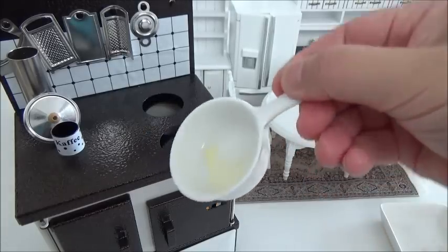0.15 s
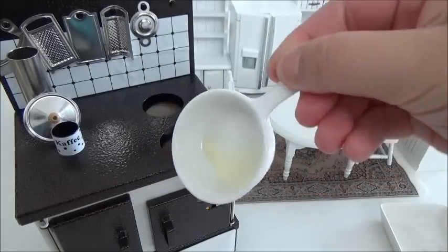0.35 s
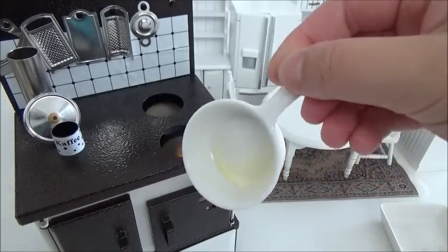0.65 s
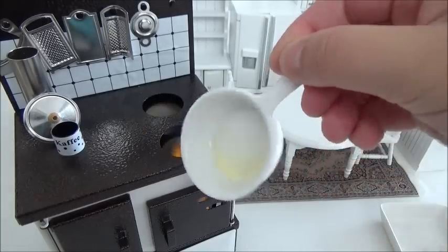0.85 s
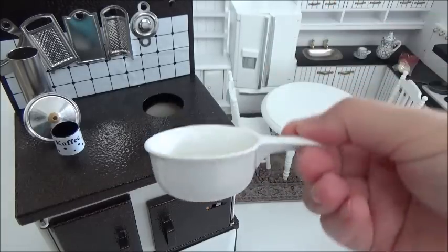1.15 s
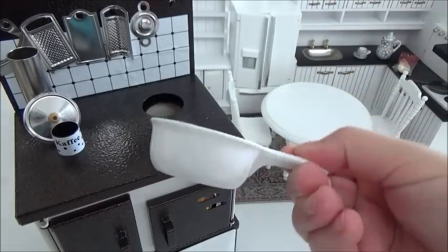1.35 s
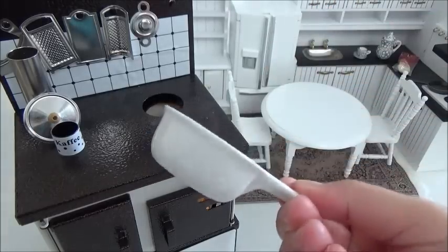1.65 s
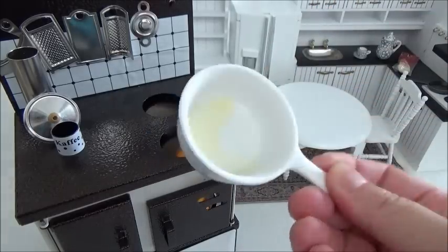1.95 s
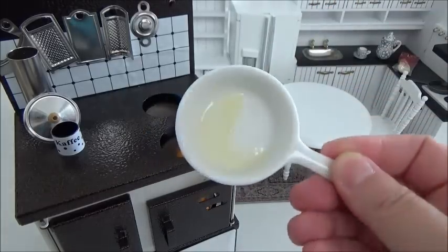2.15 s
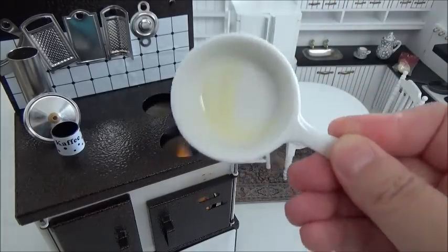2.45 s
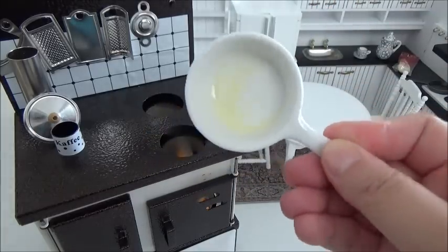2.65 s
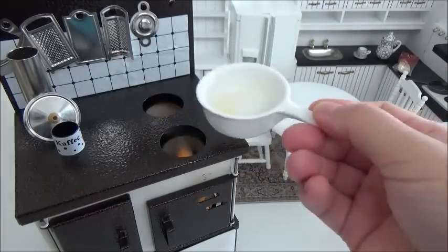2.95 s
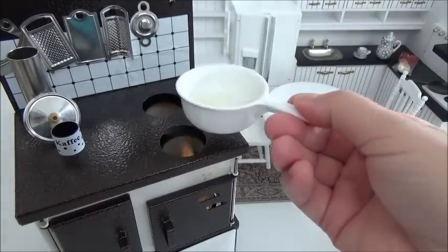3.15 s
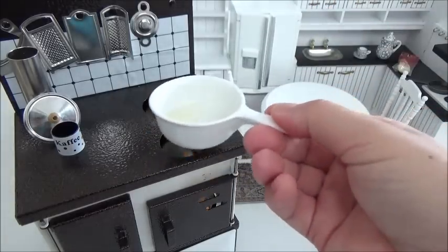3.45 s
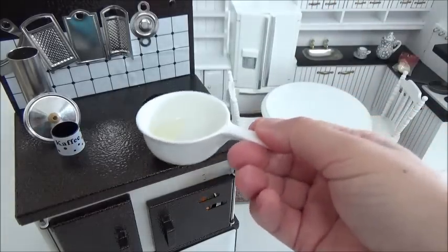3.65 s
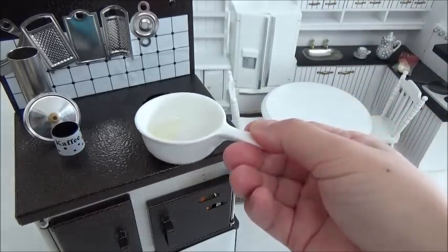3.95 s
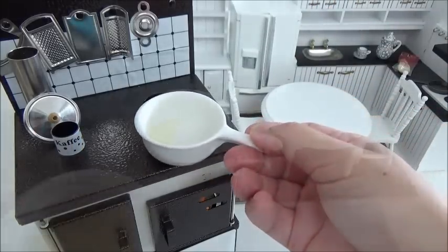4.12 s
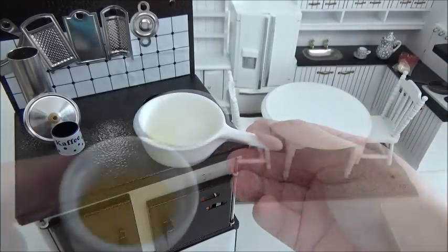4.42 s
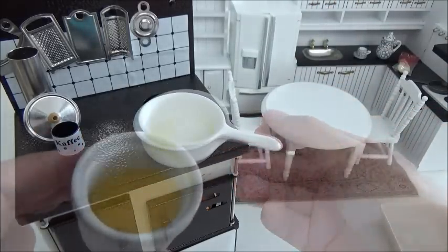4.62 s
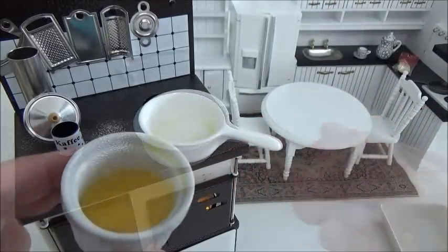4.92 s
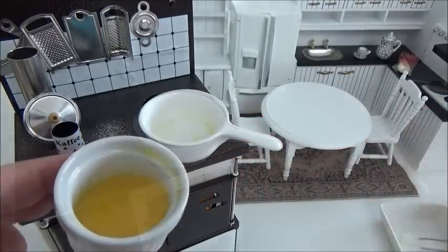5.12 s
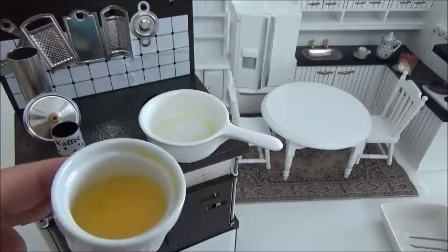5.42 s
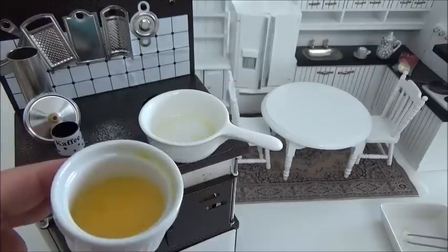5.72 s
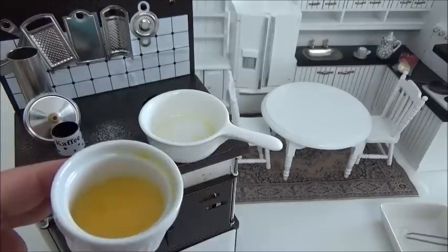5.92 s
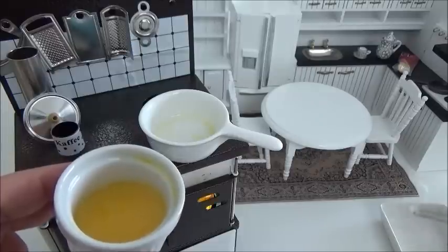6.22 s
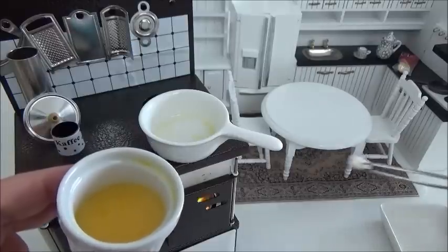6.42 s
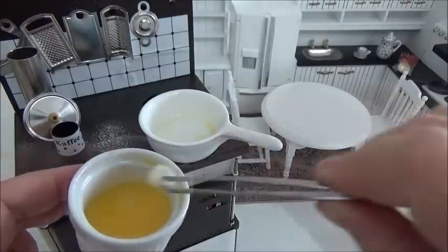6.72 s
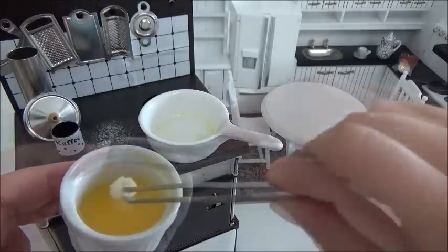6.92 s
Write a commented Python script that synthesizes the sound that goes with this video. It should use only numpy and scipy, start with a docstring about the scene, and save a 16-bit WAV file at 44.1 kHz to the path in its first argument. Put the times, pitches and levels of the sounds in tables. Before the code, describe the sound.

Bright, crackling sizzle of hot oil fades, surges once and dwindles; a soft pan knock, louder hum, then tiny crockery clicks and a metallic tink.

```python
"""A film of oil sizzles close by in a doll-size ceramic pan on a tiny stove: dense damped sines and ticks.
It flares as the pan is tilted, with snaps, pings and whistling spurts of steam, then dies away.
The pan is set down with a light knock: filtered noise for the stove, dying sines for pan and burner.
After that the humming room (shaped noise) is louder, and a little cup and steel tweezers click
as they are handled: short noise bursts and ringing modes."""
import sys
import numpy as np
from scipy import signal
from scipy.fft import irfft
from scipy.io import wavfile
from scipy.ndimage import uniform_filter1d

SR = 44100
rng = np.random.default_rng(int(sys.argv[2]) if len(sys.argv) > 2 else 0)


def put_to_file(sound):
    """Save the sound as 16-bit audio at rate SR, in the file named by the first command-line argument."""
    columns = np.atleast_2d(sound).T  # one column per channel
    safe = np.clip(columns, -1, 1)
    whole_steps = np.round(safe * 32767)
    wavfile.write(sys.argv[1], SR, whole_steps.astype(np.int16))


N = 311787
TIME = np.arange(N) / SR

USUAL_DB = -50  # level of a moderate sizzle
FIERCE_DB = -49.5  # above this level the boiling oil brightens

# colour of the sizzle: f/Hz, level/dB
FIZZ_COLOUR = [(600, -27), (1500, -7), (2200, 0), (2650, -0.5), (3000, 1.5), (4400, 0.5), (5600, -1.5),
               (7500, -4.5), (10000, 5.5), (13000, 1.5), (15500, 4.5)]
# colour of a bubble's snap: f/Hz, level/dB
SNAP_COLOUR = [(700, -26.5), (2000, -9), (2650, -10), (3050, -1.5), (4200, -3), (5500, -1.5), (7500, -3),
               (10300, 2.5), (13200, -2), (15300, 3), (18000, -3)]
# colour of the little cup: f/Hz, level/dB
CUP_COLOUR = [(1000, 4), (2000, -11), (2750, 3), (3450, 1), (4000, 4), (4700, 2), (5400, 8), (6550, 12.5),
              (7550, 4), (8400, 5.5), (11300, 5.5), (13000, 2.5), (15500, 1)]


def sizzle(gain_db=-0.6, spread_db=5.0, largest=3.03, favour_db=10.5, favour_hz=1400,
           cycles=1.0, tick_db=1.5, count=32):
    """Countless tiny bubbles tick and ring: gentle oil spits in clumps, fierce oil fizzes densely."""
    # the oil as the pan is tilted: t/s, thinness of the film (0-1), ring of the bowl/dB
    oil = [(0, 0.3, 9), (.3, 0.35, 7), (1.1, 0.11, -3), (1.9, 0.03, -5), (2.15, 0.07, 1), (2.55, 0.76, -22),
           (2.85, 0.5, 0), (3.1, .2, 16), (3.8, 0, 6)]
    bubbles_per_s, clump_usual_db = 2400, 2  # before clumping, for a thick film at USUAL_DB
    doubling_db = 10  # this much louder, twice as many bubbles burst
    clump_fall = 0.1  # dB less clumping for each dB louder
    film_db = 15  # a thin film fizzes as densely and evenly as a pool this much louder
    tilt_usual_db, brightening = -4.5, 2.6  # treble tilt, and its rise per dB above FIERCE_DB

    level_db, centre_hz = boiling()
    s, *columns = np.transpose(oil)
    film, bowl_db = (np.interp(TIME, s, column) for column in columns)
    crowding_db = level_db - USUAL_DB + film_db * np.clip(film, 0, 1)
    rate = bubbles_per_s * 2 ** (crowding_db / doubling_db)
    clump_db = np.maximum(clump_usual_db - clump_fall * crowding_db, 0)
    tilt_db = tilt_usual_db + brightening * np.maximum(level_db - FIERCE_DB, 0)

    # when each bubble bursts, how big it is and which pitch it takes
    unevenness = evened(uniform_filter1d(rng.standard_normal(N), size=300))
    clumps = amp(clump_db * unevenness)
    at = np.flatnonzero(rng.random(N) < rate * clumps / SR)
    size_draw, sign_draw, pitch_draw = rng.random((N, 3))[at].T
    size_db = spread_db * np.minimum(-np.log(size_draw), largest)
    sizes = clumps[at] * amp(size_db) * np.sign(sign_draw - .5)
    kind = (pitch_draw * count).astype(int)

    rings = np.zeros(N)
    for k, hz in enumerate(np.linspace(3400, 15500, count)):
        chosen = kind == k
        i = at[chosen]
        favoured_db = favour_db * np.exp(-((hz - centre_hz[i]) / favour_hz) ** 2)
        weight_db = tilt_db[i] * np.log(hz / 8500) + favoured_db
        train = np.zeros(N)
        train[i] = sizes[chosen] * amp(weight_db)
        note = bubble(hz, cycles * (1 + k % 3) * hz / 10000)
        rings += signal.oaconvolve(train, note / np.linalg.norm(note))[:N]
    ticks = np.zeros(N)
    ticks[at] = amp(tick_db) * sizes
    fizz = hollow(coloured(rings, FIZZ_COLOUR) + coloured(ticks, SNAP_COLOUR), bowl_db)

    # level the fizz, then let it follow the boiling
    power = uniform_filter1d(fizz ** 2, size=2500)
    loudness = np.sqrt(abs(power) + 1e-3 * np.median(power) + 1e-12)
    fade = np.interp(TIME, [4, 4.6], [1, 0])  # the sizzle fades out between 4 and 4.6 s
    return fade * amp(level_db + gain_db) * fizz / loudness


def boiling():
    """How hard the oil boils, as a level in dB, and the pitch in Hz its bubbles favour."""
    # the fine sizzle before surges and gain: t/s, level/dB, favoured bubble pitch f/Hz
    course = [(0, -36.5, 10100), (0.115, -39.5, 10000), (0.165, -45, 10500), (0.37, -48.5, 9800),
              (0.6, -50.5, 9700), (0.8, -55.5, 10200), (0.97, -56.5, 10000), (1.07, -63, 12000),
              (1.3, -64, 13000), (1.56, -67, 12200), (1.63, -62, 11600), (1.8, -62, 12000),
              (1.87, -49.5, 14200), (1.93, -47, 14400), (1.98, -46, 9200), (2.04, -43, 8200),
              (2.15, -38, 12400), (2.31, -43, 11500), (2.39, -50, 13400), (2.76, -54, 11900),
              (3.05, -64, 11500), (3.45, -65.5, 12000), (4, -70.5, 13400)]
    # brief surges and lulls: start t/s, length/s, extra level/dB
    surges = [(0.231, 0.018, 4.5), (0.267, 0.043, -3.5), (0.29, 0.012, 2), (0.624, 0.051, -5.5),
              (0.7, .024, 3.5), (2.624, 0.055, -1.5), (2.889, 0.048, 1.5)]
    s, level_db, centre_hz = np.transpose(course)
    surges_db = sum(db * plateau(start, length, edge_s=0.0019) for start, length, db in surges)
    return np.interp(TIME, s, level_db) + surges_db, np.interp(TIME, s, centre_hz)


def bubble(hz, cycles, size=400):
    """A bursting bubble: a sine that decays to 1/e over the given cycles."""
    turns = hz * np.arange(size) / SR
    return np.sin(2 * np.pi * turns) * np.exp(-turns / max(cycles, .2))


def crackle(per_s=260, over_db=6, spread_db=4, largest=1.6, follow=1.0, dull_db=-3, bright_db=6,
            fierce_span_db=9, loudest_db=-25, end_s=4.1, count=16):
    """Middle-sized bubbles snap at random, louder and brighter the harder the oil boils."""
    at = np.flatnonzero((rng.random(N) < per_s / SR) & (TIME < end_s))
    size, chance = rng.random((N, 2))[at].T
    level_db = boiling()[0][at]
    size_db = spread_db * np.minimum(-np.log(size), largest)
    peaks_db = USUAL_DB + follow * (level_db - USUAL_DB) + over_db + size_db
    fierceness = np.clip((level_db - FIERCE_DB) / fierce_span_db, 0, 1)
    brightness = (chance + fierceness) / 2
    # a small set of snaps, from dull to bright, to draw on
    snaps = [snap(treble_db) for treble_db in np.linspace(dull_db, bright_db, count)]
    out = np.zeros(N)
    for i, peak_db, share in zip(at, peaks_db, brightness):
        add(out, i / SR, amp(min(peak_db, loudest_db)) * snaps[int(share * count)])
    return out


def pops(gain_db=2):
    """The larger bubbles burst one by one, each with a dry snap."""
    # snaps: t/s, peak level/dB before gain, treble against the middle/dB
    bursts = [(.0217, -16, 4.5), (.0308, -18, 9), (0.1, -17, 6), (.1027, -21, 6), (.1163, -19, 2),
              (0.125, -21, -3), (0.178, -24.5, -2), (.196, -26.5, -5), (.223, -22, -3), (.246, -23, -1),
              (.2506, -27, -1), (0.293, -20, 4), (.2985, -26, 7), (0.307, -26, 5), (0.335, -28, 5),
              (.3418, -24, 4), (.3525, -24, 2), (0.3724, -24, 1), (.3844, -29, -2), (.4146, -30, -2),
              (.419, -25, 3), (.4346, -29, 4), (.4422, -24, -2), (.4632, -26, 3), (.4836, -25, 0),
              (.4905, -24, 2), (.5025, -29, 3), (0.5153, -17, 3), (0.5274, -24, 3), (0.53, -29, -2),
              (.5396, -30, 4), (.548, -28, 1), (0.564, -26, 0), (.5939, -27, 1), (0.5996, -26, 1),
              (.6073, -24, 3), (.6133, -28, 3), (.6217, -21.5, 1), (0.6454, -22, 2), (.662, -24, 1),
              (.6649, -27, 2), (.6774, -26, 3), (.6871, -26, 3), (.69, -18.5, 0.5), (.6929, -27, 5),
              (.6975, -22, 1), (.716, -26, 0), (0.7235, -24, 1), (.729, -19, 4), (.734, -21, 2),
              (.7533, -29, 1), (.7592, -30, 1), (.7765, -19, 3), (.793, -26, 6), (.803, -24.5, 0),
              (.846, -28, 4), (.863, -30, 0), (0.8893, -34, -6), (0.9094, -19, 2), (0.926, -30, 4),
              (.9436, -30, 2), (.9633, -32, 1), (.9714, -20.5, 0), (0.9767, -31, 0), (1.012, -23.5, -.5),
              (1.015, -24, 3), (1.03, -21.5, 1), (1.069, -22, 2), (1.108, -38, 0), (1.1405, -38, 3),
              (1.1634, -26, -3.5), (1.1702, -22.5, 1), (1.19, -31, 2), (1.1959, -25, -1.5),
              (1.209, -32, -4), (1.2154, -36, -5), (1.275, -25, 2), (1.2807, -35, -5), (1.2996, -27, -4),
              (1.3168, -36, 4), (1.363, -38, 0), (1.4688, -41, 5), (1.4812, -40, -1), (1.5072, -40, 3),
              (1.5963, -32, 1), (1.612, -32, -2), (1.6164, -27, -3.5), (1.64, -32, 2), (1.6456, -35, 4),
              (1.6741, -36, 2), (1.703, -29, -5.5), (1.7323, -33, -7), (1.7488, -35, 12), (1.7715, -26, 14),
              (1.791, -31, -1), (1.8128, -23, 5.5), (1.817, -25, 3), (1.855, -25, 1), (1.899, -21, 8),
              (1.912, -23, 13), (1.923, -26, 5), (1.9397, -18, -1.5), (1.9437, -24, -1), (1.969, -21, 2),
              (1.977, -26, 4), (1.9905, -19, 2), (1.9973, -18, 1), (2.013, -18.5, 2), (2.0178, -21, 1),
              (2.0262, -19, 5), (2.03, -21, 5), (2.048, -17, 1), (2.0564, -20, 3), (2.0864, -19, -2),
              (2.0954, -19, 2), (2.1066, -17, 8), (2.139, -18, 7), (2.147, -17, 7), (2.1776, -18, 7),
              (2.2354, -23, -2.5), (2.2388, -22.5, -1), (2.2487, -26, 8), (2.2769, -24, 6),
              (2.2963, -22.5, 0), (2.3031, -27, -1), (2.3566, -31, 2), (2.3941, -34, 1), (2.424, -31, 0),
              (2.465, -31, -4), (2.4754, -34, 3), (2.515, -36, -1), (2.5262, -32, -5), (2.5463, -32, -8),
              (2.5763, -32, -3), (2.581, -29, -2), (2.5914, -20.5, -3), (2.637, -35, 0), (2.6809, -23.5, 1),
              (2.7138, -28, 11), (2.7293, -32, 0), (2.7377, -25, -4.5), (2.7726, -32, -1),
              (2.7836, -29, -.5), (2.7886, -34, 6), (2.8037, -31, -2), (2.8392, -35, 1), (2.9021, -35, 0),
              (2.9126, -33.5, -3), (2.963, -34, -1), (3.063, -32.5, -2), (3.0735, -30, 1.5),
              (3.1543, -36.5, 0), (3.159, -35, -1), (3.3067, -37, -3), (3.34, -37.5, -4), (3.362, -40, -4),
              (3.648, -35, 4.5), (3.9365, -34.5, 0), (3.9564, -43, 2)]
    out = np.zeros(N)
    for s, db, treble_db in bursts:
        add(out, s, amp(db + gain_db) * snap(treble_db))
    return out


def snap(treble_db, spray_db=-26, spray_s=0.0021, uneven_db=1.5, count=9, size=512):
    """A bubble's skin tears: a pulse and brief spray ring in the bowl, with a slight unevenness of tone."""
    burst = amp(spray_db) * contact(spray_s, size=size)
    burst[0] = 1
    hz = np.linspace(3000, 16000, count)
    tone_db = treble_db * np.log2(hz / 7000) + uneven_db * rng.standard_normal(count)
    toned = coloured(coloured(burst, SNAP_COLOUR), np.transpose([hz, tone_db]))
    return peaked(hollow(toned, share_db=-4.0))


def pings(gain_db=-2.0, spray_db=-19, spray_s=0.0022):
    """A few surfacing bubbles ring on at their own pitch, each with a brief spray of droplets."""
    # ringing bubbles: t/s, peak level/dB before gain, pitch f/Hz, decay to 1/e in cycles
    surfacings = [(0.0304, -20, 9600, 13), (.0408, -21, 9250, 14), (0.049, -25, 8750, 3.4),
                  (.101, -20, 9200, 11), (0.1096, -17, 9940, 11), (.293, -25, 9750, 2.7),
                  (0.3923, -21.5, 7400, 2.9), (0.792, -26, 9200, 4.5), (1.0694, -29, 3160, 2),
                  (1.273, -22, 14700, 5.7), (1.773, -18.5, 11500, 12), (2.181, -22, 11500, 22)]
    out = np.zeros(N)
    for s, db, hz, cycles in surfacings:
        spray = amp(spray_db) * coloured(contact(spray_s), FIZZ_COLOUR)
        burst = peaked(bubble(hz, cycles, size=len(spray))) + spray
        add(out, s, amp(db + gain_db) * peaked(hollow(burst)))
    return out


def spurts(whistle_width_hz=900, grit_db=6, size=4000):
    """Steam squeezes out of the oil: sputtering hisses whose whistle glides as the opening changes."""
    # jets: t/s, length/s, level/dB before fades, whistle start f/Hz, end f/Hz, whistle against hiss/dB
    jets = [(0.293, 0.02, -42.5, 7000, 7100, 19), (1.409, 0.012, -55, 9050, 8700, 8),
            (1.436, 0.02, -59, 8600, 8300, 4), (1.533, 0.019, -48.5, 6400, 6400, -26),
            (1.594, 0.014, -46, 10500, 11000, -14), (1.661, 0.0057, -46, 9800, 9700, -3),
            (1.68, 0.0092, -43, 10000, 9900, -6), (1.701, 0.011, -50, 10000, 9700, 0),
            (1.732, 0.012, -49.5, 9200, 8600, -5), (1.889, 0.014, -38.5, 11700, 11200, -7),
            (1.966, 0.02, -44, 8300, 9200, 12), (2.098, 0.0226, -36.5, 8200, 9400, 13),
            (2.12, 0.023, -49, 13200, 14800, 12), (2.148, 0.011, -48, 6900, 7000, 13),
            (2.202, 0.024, -49, 12200, 13400, 12), (2.698, .02, -43.5, 14000, 12000, 8)]
    pole = np.exp(-np.pi * whistle_width_hz / SR)
    out = np.zeros(N)
    for s, length, db, start_hz, end_hz, whistle_db in jets:
        jet = sputter(length, grit_db, size=size)
        glide_hz = np.linspace(start_hz, end_hz, len(jet))
        turn = np.exp(2j * np.pi * np.cumsum(glide_hz) / SR)
        # a narrow band of the jet's own noise, kept around the gliding pitch
        whistle = (turn * signal.lfilter([1], [1, -pole], jet / turn)).real
        hiss = hollow(coloured(jet, SNAP_COLOUR), share_db=-5)
        steam = evened(hiss) + amp(whistle_db) * evened(whistle)
        add(out, s, amp(db) * evened(steam) * signal.windows.tukey(len(steam), .5))
    return out


def sputter(length, grit_db, size):
    """A short rush of noise, broken into uneven grains."""
    hiss, grains = rng.standard_normal((2, size))
    rough = hiss * amp(grit_db * evened(uniform_filter1d(grains, size=24)))
    return rough[:int(abs(length) * SR) + 20]


def hollow(x, share_db=0):
    """Adds the short ring of the pan's bowl and the stove's recess, as resonant filters."""
    # resonances: f/Hz, width/Hz, level/dB before the share
    resonances = [(3360, 780, -4.5), (6380, 470, 9.5), (6700, 570, 1)]
    rings = sum(amp(db) * resonated(x, hz, width) for hz, width, db in resonances)
    return x + amp(share_db) * rings


def knocks(thud_s=0.0027, rattle_db=-23, tick_s=0.0006, tick_after_s=0.0016, skid_db=-12):
    """The stove top thuds while the pan ticks; seated firmly, it makes the burner ring."""
    # pan bumping the stove: t/s, peak level of the body/dB, of the contact tick/dB
    bumps = [(0.0578, -31.5, -50), (2.884, -41, -49), (3.0253, -36.5, -56), (3.785, -45, -34),
             (6.273, -34, -54)]
    # the stove top's dull response: f/Hz, level/dB
    stove = [(50, -17), (100, -1), (190, 9), (380, 5), (560, -14), (820, -2), (1050, -9), (1350, -4),
             (1800, -17), (2650, -17), (3300, -25), (9000, -29)]
    # modes of the glazed pan: f/Hz, level/dB, t60/s
    pan = [(2780, -16, .04), (5100, 5, 0.024), (5690, 5, 0.016), (5870, 0, .012), (6300, -13, 0.014),
           (10500, -10, 0.0054)]
    # the pan seated on the burner ring: t/s, peak level/dB
    seatings = [(3.786, -40.5)]
    # modes of the burner ring: f/Hz, level/dB, t60/s
    burner = [(650, 1, 0.05), (700, -14, 0.022), (820, -3, .035), (1330, -9, .03), (1790, -13, 0.074),
              (2720, -14, 0.09)]
    out = np.zeros(N)
    for s, body_db, tick_db in bumps:
        push = amp(rattle_db) * contact(thud_s)
        tap = amp(skid_db) * contact(tick_s)
        push[0] = tap[0] = 1
        add(out, s, amp(body_db) * peaked(coloured(push, stove)))
        tick = signal.fftconvolve(tap, ring(pan))
        add(out, s + tick_after_s, amp(tick_db) * peaked(tick))
    for s, db in seatings:
        add(out, s, amp(db) * peaked(ring(burner)))
    return out


def clicks(snap_s=0.00065, slide_s=0.0052, slide_db=-15, brightening=1.8, usual_db=-8,
           cup_db=-5, firm_db=-24, waking=1.0):
    """Crockery held in the fingers snaps and slides briefly; firm clicks wake the cup's ring more."""
    # dry clicks: t/s, peak level of the touch/dB, treble against the middle/dB
    touches = [(3.541, -37, -6), (4.037, -31.5, -4), (4.119, -37, -14), (4.263, -35, -4), (4.2986, -29, -9),
               (4.398, -35, -7), (4.535, -30, -11), (4.949, -33, -5), (5.02, -24, -9), (5.0262, -35, -8),
               (5.0345, -28, -7), (5.8677, -29, -7), (6.197, -36, -13), (6.3094, -39, -12),
               (6.334, -33, -11.5), (6.8703, -34, -9), (6.9494, -32, -3), (7.0193, -39, -8)]
    # modes of the cup: f/Hz, level/dB, t60/s
    cup = [(2570, -10, 0.014), (2860, -3.5, 0.013), (6470, 0, 0.014)]
    out = np.zeros(N)
    for s, db, treble_db in touches:
        touch = coloured(contact(snap_s) + amp(slide_db) * contact(slide_s), CUP_COLOUR)
        touch = coloured(touch, [(6500, 0), (12000, brightening * (treble_db - usual_db))])
        body = amp(cup_db + waking * (db - firm_db)) * peaked(ring(cup, size=len(touch)))
        add(out, s, amp(db) * (peaked(touch) + body))
    return out


def tweezers(free_db=-13, held_s=0.0075, skid_db=-10, skid_s=0.0019):
    """The steel tips skid; the blades ring hard while they touch, then faintly on their own."""
    # tips touching a dish: t/s, peak level of the blades/dB
    tinks = [(5.6654, -18)]
    # modes of the free blades: f/Hz, level/dB, t60/s
    steel = [(2150, -17, .1), (6045, -7, .05), (7757, -9, .12), (10130, -8, .05), (10920, -7, .08),
             (12620, 2, .03), (12980, 1, .05), (13510, -4, .06), (13790, -1, .04), (14240, -3, .08),
             (14610, -7, .1), (15440, -6, .05)]
    skid_colour = [(5000, -24), (6200, -10), (9000, -28), (12000, -18),
                   (12800, 2), (14200, 2), (15500, -11)]  # f/Hz, level/dB
    out = np.zeros(N)
    for s, db in tinks:
        blades = ring(steel)
        held = np.exp(-np.arange(len(blades)) / (held_s * SR))
        blades = blades * (held + amp(free_db))
        skid = coloured(contact(skid_s), skid_colour)
        add(out, s, amp(db + skid_db) * peaked(skid))
        add(out, s + .0008, amp(db) * peaked(blades))
    return out


def scrapes(grit_db=5, size=2000):
    """Tweezers and fingers scrape over crockery: an edge catches and slips on glaze, ringing the dish."""
    # scrapes: t/s, length/s, level/dB before fades
    rubs = [(4.956, 0.0099, -47.5), (5.08, 0.0087, -54), (6.085, 0.0078, -54.5), (6.098, .008, -54),
            (6.126, .02, -54.5), (6.156, .007, -53), (6.176, .009, -55), (6.269, 0.013, -49.5),
            (6.323, 0.0063, -54), (6.46, 0.016, -51.5), (6.527, 0.014, -48.5), (6.758, 0.0094, -57.5),
            (6.876, .012, -54)]
    # resonances of a scraped dish: f/Hz, width/Hz, level/dB
    dish = [(5400, 330, -2), (6560, 500, 3), (7400, 390, -2), (8500, 400, 1.5), (10000, 500, 0),
            (11200, 600, -5), (13200, 2000, -10)]
    out = np.zeros(N)
    for s, length, db in rubs:
        slips = sputter(length, grit_db, size=size)
        rub = sum(amp(mode_db) * resonated(slips, hz, width) for hz, width, mode_db in dish)
        add(out, s, amp(db) * evened(rub) * signal.windows.tukey(len(rub), .4))
    return out


def fingers(level_db=-66, per_s=70, spread_db=1.0, decay_s=0.0069, start_s=4.03):
    """Fingertips shift on the cup: faint random ticks of decaying noise."""
    size_db = spread_db * np.minimum(rng.exponential(1, N), 3)
    sizes = amp(size_db) * (rng.random(N) < per_s / SR) * (TIME > start_s)
    envelope = signal.lfilter([1], [1, -np.exp(-1 / (decay_s * SR))], sizes)
    return amp(level_db) * coloured(envelope * rng.standard_normal(N), CUP_COLOUR)


def ring(modes, size=9000):
    """A struck object: the sum of its modes as dying sines."""
    t = np.arange(size) / SR
    return sum(amp(db - 60 * t / t60) * np.sin(2 * np.pi * hz * t) for hz, db, t60 in modes)


def contact(decay_s, size=1500):
    """A brief rough touch of two hard surfaces: decaying noise."""
    t = np.arange(size) / SR
    return rng.standard_normal(size) * np.exp(-t / decay_s)


def short_tail(x, tail_db=-16, t60_s=0.055, side_db=-6, side_hz=10500, size=12000):
    """A faint, short tail of decaying noise, slightly widened."""
    t = np.arange(size) / SR
    tail = amp(-60 * t / t60_s) * (t > .002)
    taps = amp(tail_db) * tail / np.linalg.norm(tail) * rng.standard_normal((2, size))
    mid, side = signal.oaconvolve(x[None], taps, axes=1)[:, :N]
    side = coloured(side, [(4000, -3), (6000, 0), (side_hz, 0), (13000, -12)])
    return mid + amp(side_db) * side * np.array([[1], [-1]])


def ventilation(waver_db=0.49, rush_balance_db=-1.2):
    """Noise shaped into a drone with narrow tones, and a rush of air a little to the right below 2 kHz."""
    # low drone: f/Hz, relative level per Hz/dB
    drone = [(15, -22), (60, -19.5), (92, -16.5), (112, -11.5), (130, -3.5), (158, -8.5), (178, 0.5),
             (232, -0.5), (256, -6), (295, -2), (345, -6.5), (385, -10), (480, -13), (690, -18.5),
             (1000, -79)]
    # airy rush, on the same scale and before the balance: f/Hz, relative level per Hz/dB
    rush = [(300, -32), (690, -43), (770, -15.5), (1050, -13.5), (1350, -18), (1800, -22.5), (2600, -27.5),
            (4500, -34), (5600, -33), (6400, -30.5), (7600, -36.5), (10000, -36.5), (12000, -38),
            (15700, -37)]
    # narrow tones: f/Hz, half-width at quarter power/Hz, level against drone and rush/dB
    hum = [(127.3, 2.2, -22), (282.2, 1.9, -9), (299.4, 5.6, -11.5), (345.2, 3.4, -9.5), (475.4, 17, -17.5),
           (756.6, 11.6, -20.5), (865, 14, -27), (1377, 1.9, -24.5), (13248, 15, -65)]
    # left-right likeness: f/Hz, likeness (0-1)
    likeness = [(30, 1), (70, 1), (130, 0.97), (250, 1), (500, 0.98), (1200, 1), (3000, 1), (15000, 1)]
    hz = np.fft.rfftfreq(N, 1 / SR)
    a, b = rng.standard_normal((2, len(hz))) + 1j * rng.standard_normal((2, len(hz)))
    alike = np.clip(read(likeness, hz), -1, 1)
    balance_db = rush_balance_db * np.array([[.5], [-.5]]) * (hz < 2000)
    power = amp(read(drone, hz)) ** 2 + amp(read(rush, hz) + balance_db) ** 2
    power = power / power.mean()
    for centre, width, db in hum:
        line = 1 / (1 + ((hz - centre) / width) ** 2) ** 2
        power = power + amp(db) ** 2 * line / line.mean()
    channels = np.array([a, alike * a + np.sqrt(1 - alike ** 2) * b])
    air = evened(irfft(channels * np.sqrt(power), N))
    slow_hz = np.geomspace(1, 9, 12)
    waver = evened(sum(np.sin(2 * np.pi * (f * TIME + rng.random())) for f in slow_hz))
    return air * amp(room_level() + waver_db * waver)


def room_level(change_s=0.0019):
    """The drone's level in dB: a step at the start of each stretch, then a slow rise."""
    # stretches: start t/s, level/dB, rise/(dB per s)
    stretches = [(0, -56.5, 2), (1.98, -59, 2.5), (4.02, -43.5, 0.15)]
    level_db = np.full(N, float(stretches[0][1]))
    for s, db, rise in stretches:
        stretch_db = db + rise * (TIME - s)
        level_db += np.clip((TIME - s) / change_s, 0, 1) * (stretch_db - level_db)
    return level_db


def rumble(hz=35, wander=0.029, fade_s=.15, rest_db=-86):
    """A deep tone in the building, drifting slightly in pitch and swelling now and then."""
    # swells, added to the resting tone: start t/s, length/s, level/dB
    rises = [(1.35, 0.66, -71), (4.1, 1.5, -69), (6.05, 0.72, -71)]
    drift = evened(uniform_filter1d(rng.standard_normal(N), size=8000))
    tone = evened(np.sin(2 * np.pi * np.cumsum(hz * (1 + wander * drift)) / SR))
    swells = sum(amp(db) * plateau(s, length, fade_s) for s, length, db in rises)
    return tone * (amp(rest_db) + swells)


def plateau(start, length, edge_s):
    """An envelope that rises, holds and falls."""
    return np.clip(np.minimum(TIME - start, start + length - TIME) / edge_s, 0, 1)


def resonated(x, hz, width):
    """A single resonance, as a peak filter of the given width in Hz."""
    return signal.lfilter(*signal.iirpeak(hz, hz / width, SR), x)


def coloured(x, points):
    """Filters by a spectrum with minimum phase, so that attacks stay sharp."""
    size = 1024
    log_gain = np.log(amp(read(points, abs(np.fft.fftfreq(size, 1 / SR)))))
    taps = np.fft.ifft(np.exp(np.conj(signal.hilbert(log_gain)))).real
    return signal.oaconvolve(x, taps[:size // 2])[:len(x)]


def read(points, hz):
    """Reads a spectrum on a log-frequency axis."""
    f, value = np.transpose(points)
    return np.interp(np.log(hz + 1), np.log(f + 1), value)


def amp(db):
    """Decibels to gain."""
    return 10 ** (np.asarray(db) / 20)


def evened(x):
    """Scales to rms 1."""
    return x / np.sqrt(np.mean(x ** 2) + 1e-20)


def peaked(x):
    """Scales to peak 1."""
    return x / (abs(x).max() + 1e-20)


def add(mix, s, sound):
    """Mixes a sound in at time s."""
    part = mix[max(0, round(s * SR)):][:len(sound)]
    part += sound[:len(part)]


def scene():
    """All the small sounds lie close and straight ahead, over the room's drone."""
    oil = sizzle() + crackle() + pops() + pings() + spurts()
    handling = knocks() + clicks() + tweezers() + scrapes() + fingers()
    close = oil + handling
    room = ventilation() + rumble()
    return close + short_tail(close) + room


def record(dry):
    """The recorder's band limit: a steep low-pass."""
    edge_hz = 15950
    taps = signal.firwin(401, edge_hz, window=("kaiser", 9), fs=SR)
    return signal.oaconvolve(dry, taps[None], "same", axes=1)


dry = scene()
out = record(dry)
put_to_file(out)
```